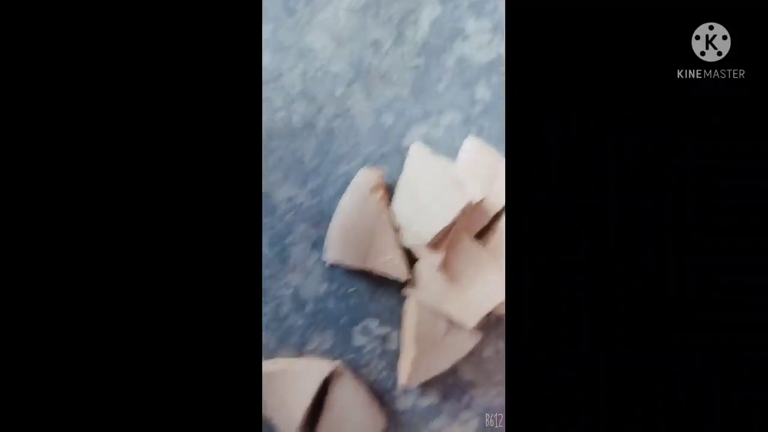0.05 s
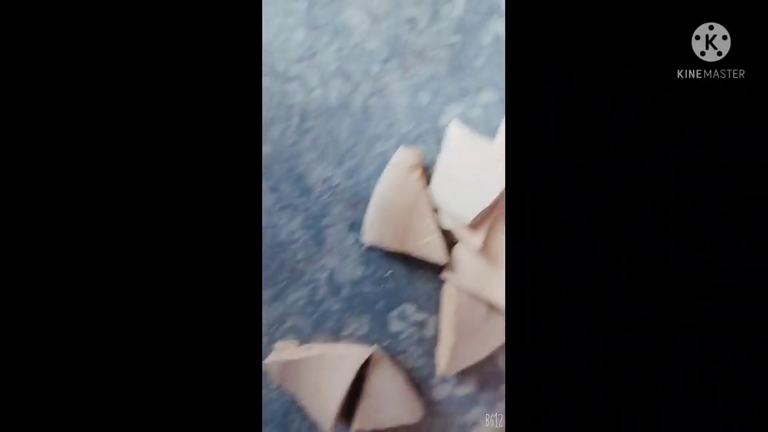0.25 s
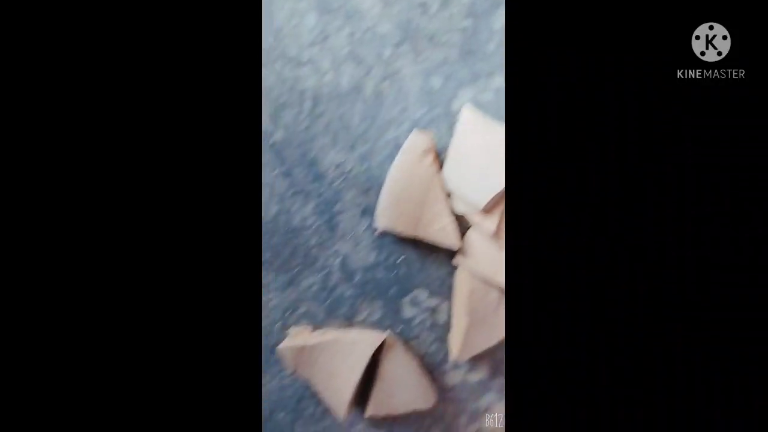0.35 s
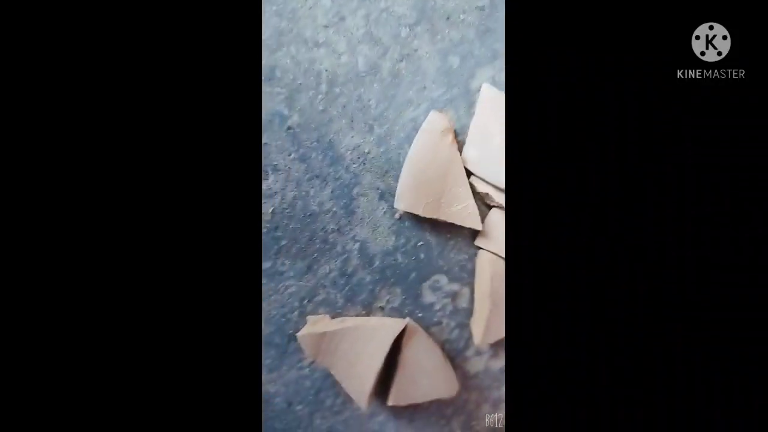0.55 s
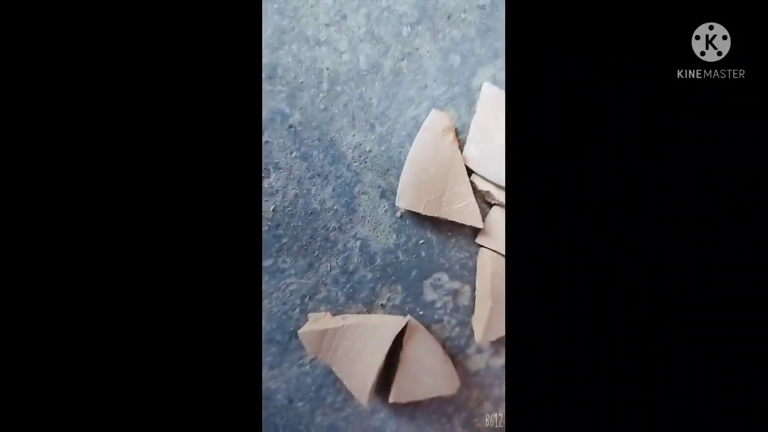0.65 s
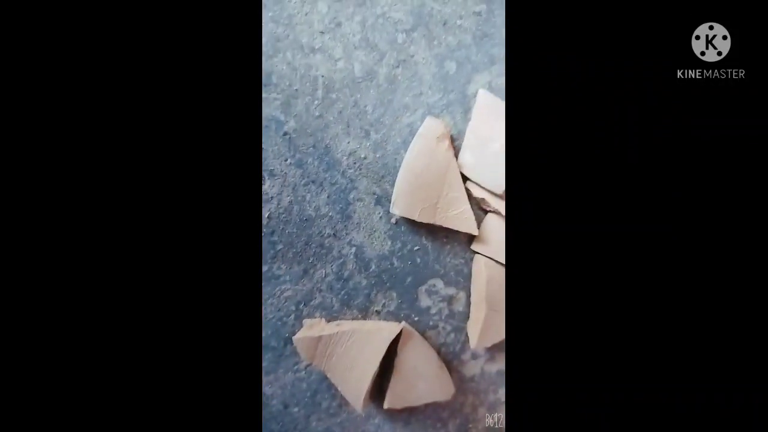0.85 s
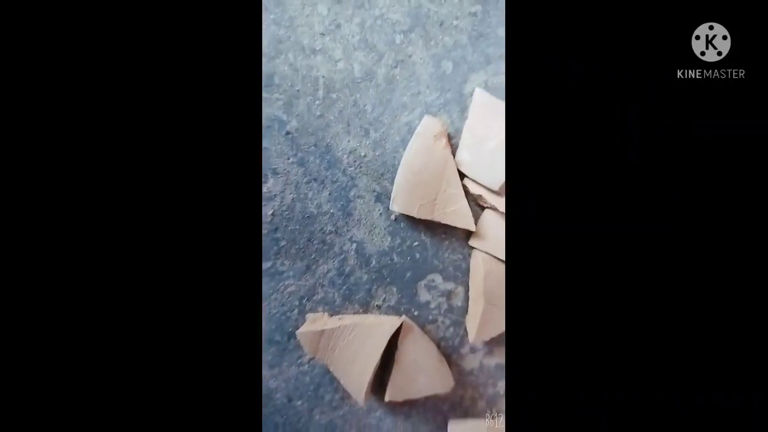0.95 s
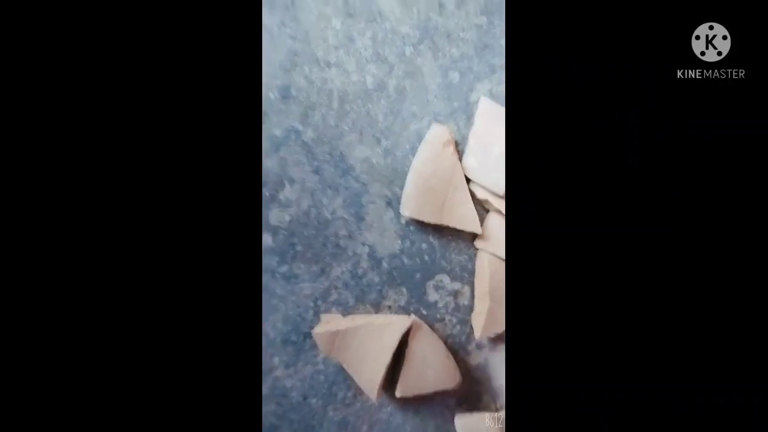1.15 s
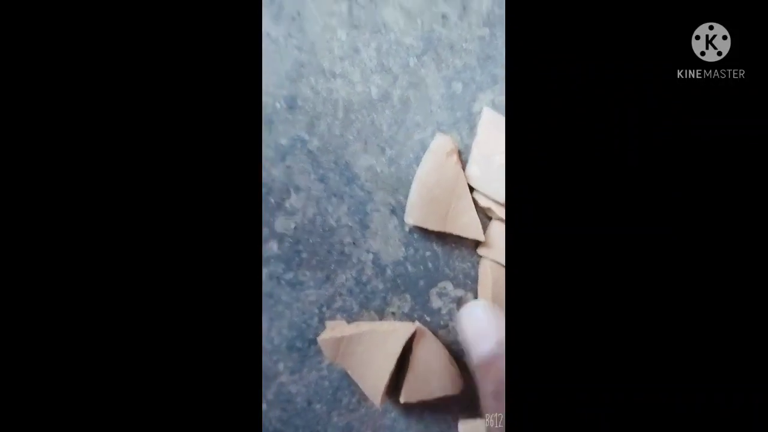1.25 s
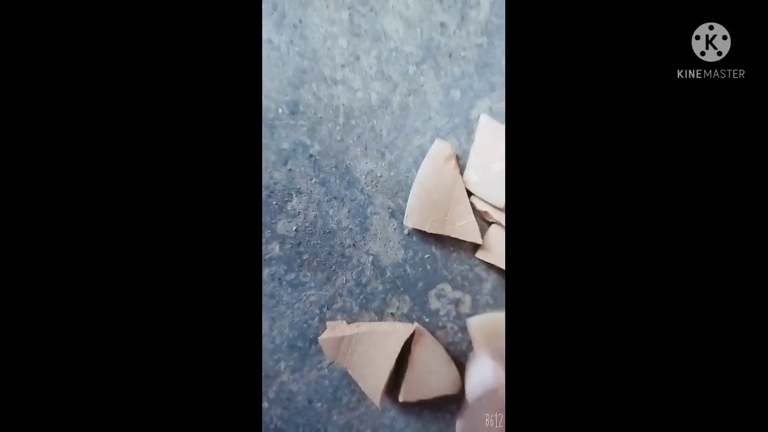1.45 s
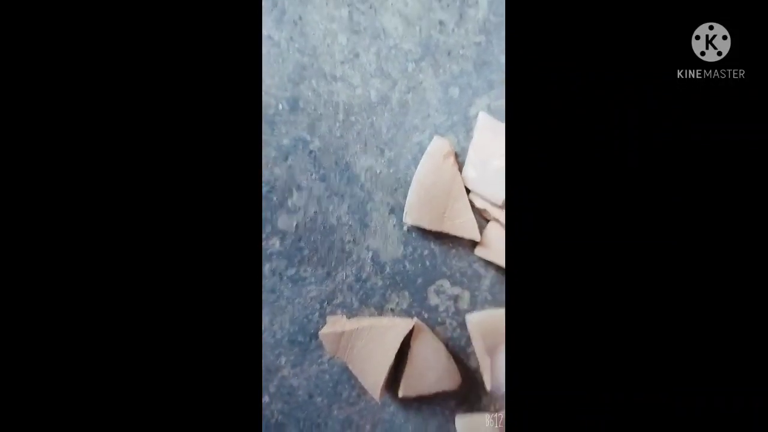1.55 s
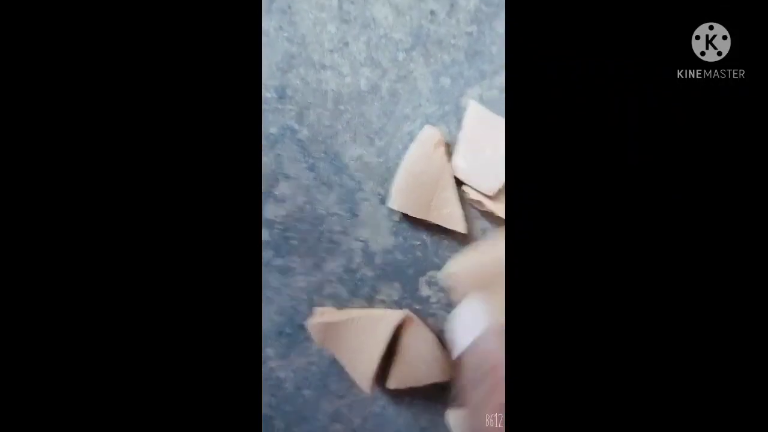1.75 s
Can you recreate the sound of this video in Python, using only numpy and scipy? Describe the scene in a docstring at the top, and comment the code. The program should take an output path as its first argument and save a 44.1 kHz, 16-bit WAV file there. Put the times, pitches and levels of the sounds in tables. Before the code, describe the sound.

Thin clay shards clink and knock on a hard slab, then rustle faintly under fingers.

```python
"""Three thin clay shards touch and ring in their bending modes, giving high, beating clinks close by.
Twice a piece is set down on a hard slab with a sharp, damped knock and settles; soft bumps wake the
slab's low modes. Then friction takes over: shards slide lightly on each other and fingers brush the
dry pile. A small room reverberates, with a low rumble throughout."""
import sys
import numpy as np
from scipy import signal
from scipy.fft import rfft, irfft
from scipy.io import wavfile

SR = 44100
rng = np.random.default_rng(int(sys.argv[2]) if len(sys.argv) > 2 else 0)


def store_wav(level_fs):
    """Save 16-bit WAV to argv[1]."""
    pcm = np.round(np.clip(np.atleast_2d(level_fs), -1, 1) * 32767)
    wavfile.write(sys.argv[1], SR, pcm.T.astype(np.int16))


N = 79380
TIME = np.arange(N) / SR


def from_db(db):
    """Amplitude ratio of a level in decibels."""
    return 10 ** (np.asarray(db) / 20)


def at_hz(points, hz):
    """Interpolation of a table along a logarithmic frequency axis."""
    f, value = np.transpose(points)
    return np.interp(np.log(np.maximum(hz, 1)), np.log(f), value)


def colour(x, spectrum):
    """Spectral shaping of white noise at constant power."""
    gain = from_db(at_hz(spectrum, np.arange(N + 1) * SR / (2 * N)))
    return irfft(rfft(x, 2 * N) * gain / np.sqrt(np.mean(gain ** 2)))[:N]


def decay(start, t60):
    """Exponential decay: a jump to 1 at the start, then a fall of 60 dB every t60 seconds."""
    return (TIME >= start) * np.exp(-np.log(1000) * np.maximum(TIME - start, 0) / t60)


def ring(start, hz, t60):
    """Free vibration of one struck mode: a damped sinusoid."""
    return decay(start, t60) * np.sin(2 * np.pi * hz * (TIME - start))


def rumble(level_db=-56):
    """Stationary noise: the room's background, strongest in the bass."""
    # background spectrum: (frequency [Hz], relative level [dB])
    spectrum = [(20, -21.5), (50, -18.5), (66, -13.5), (83, 4), (108, -5.5), (200, 3), (300, -3),
                (600, -8.5), (1000, -15.5), (2100, -19.5), (4200, -28), (7900, -36.5), (10500, -29),
                (15000, -34)]
    return from_db(level_db) * colour(rng.standard_normal(N), spectrum)


def clinks(contact_s=0.0014, tick_t60=0.0051, twin_db=-12, twin_spread_db=3.5):
    """Impact excites bending modes; each beats with a close twin whose share depends on the spot struck."""
    # mode pairs, a row per shard from large to small: (frequency [Hz], twin frequency [Hz], free t60 [s])
    top_modes = [(10308, 10340, .1), (10900, 10850, .085), (11548, 11625, .1)]
    middle_modes = [(5420, 5400, .18), (5716, 5732, .21), (6092, 6150, .19)]
    low_modes = [(1902, 1906, .34), (2015, 2035, .22), (2182, 2176, .44)]
    # each shard's low mode against its middle mode: (offset [dB])
    low_offsets_db = [-4, -4.5, -2.5]
    # touches: (time [s], top mode level of each shard [dB] x 3, middle mode level of each [dB] x 3,
    #   further low mode offset [dB], tick level [dB], share of the free t60 [ratio])
    touches = [(0.001, -41.5, -38, -42, -61.5, -57, -69, 0.5, -78, 1.57),
               (0.1906, -33.5, -27, -52, -52, -62, -67, -10, -40.5, 1.29),
               (0.2705, -29, -31, -11.5, -41, -29.5, -29.5, -10.5, -23, 1.01),
               (0.281, -39, -35, -25, -48, -41.5, -38, -18.5, -31.5, 0.27),
               (0.315, -22.5, -28, -26.5, -50, -55.5, -48.5, 0.5, -42, 1.39),
               (0.385, -22.5, -19.5, -41.5, -47, -39.5, -49.5, -8, -26, 1.02),
               (0.5475, -27.5, -21.5, -32, -62.5, -51.5, -65.5, 4, -27.5, 1.1),
               (0.587, -39, -31, -45.5, -63.5, -70.5, -70, -4, -45.5, 1.23),
               (0.639, -27, -12.5, -23.5, -50, -46, -53.5, -3.5, -22, 0.87),
               (0.819, -48.5, -26, -38.5, -54.5, -66, -67, -9.5, -38, 1.24),
               (0.859, -20, -12, -21, -46, -31.5, -44.5, -8.5, -33, 0.63),
               (0.891, -35.5, -23.5, -39.5, -49, -54, -63, -7, -51, 0.36),
               (1.5603, -46, -26.5, -45, -72, -59.5, -69, 4, -34.5, 0.69),
               (1.575, -56, -35, -54, -61, -52, -75, -5.5, -51.5, .25),
               (1.617, -70, -67, -71.5, -78.5, -83, -81, -6, -49, 0.56)]
    # contact tick spectrum: (frequency [Hz], relative level [dB])
    tick_spectrum = [(500, -11.5), (3000, -33.5), (7000, -10), (10000, -5.5), (12500, 1), (14300, -5),
                     (16000, -10.5)]
    out = np.zeros(N)
    tick_noise = colour(rng.standard_normal(N), tick_spectrum)
    modes = top_modes + middle_modes + low_modes
    twins = from_db(twin_db + twin_spread_db * rng.standard_normal((len(touches), len(modes))))
    for (start, *shard_db, low_db, tick_db, t60_share), twin_gains in zip(touches, twins):
        top_db, middle_db = np.reshape(shard_db, (2, -1))
        gains = from_db(np.concatenate([top_db, middle_db, middle_db + low_db + low_offsets_db]))
        touch = from_db(tick_db) * decay(start, tick_t60) * tick_noise
        # the ring builds up while the edges are in contact
        onset = np.sin(np.pi / 2 * np.clip((TIME - start) / contact_s, 0, 1)) ** 2
        for (hz, twin_hz, free_t60), gain, twin in zip(modes, gains, twin_gains):
            t60 = free_t60 * t60_share
            beating = ring(start, hz, t60) + twin * ring(start, twin_hz, t60)
            touch += gain * onset * beating / np.hypot(1, twin)
        out += signal.fftconvolve(touch, chatter(start))[:N]
    return out


def chatter(start, contacts_per_s=1100, level_db=-21.5, t60=0.088):
    """Loose shards rattle: a dying train of random impulses, timed from the touch that sets it off."""
    contacts = (rng.random(N) < contacts_per_s / SR) * rng.standard_normal(N)
    train = contacts * from_db(level_db) * decay(0, t60)
    train[0] = 1   # the touch itself
    return train[:N - int(start * SR)]


def reverberation(x, delay_s=0.0032):
    """Diffuse reflections: convolution with noise that decays at its own rate in each band."""
    # strength of the tail: (frequency [Hz], band gain [dB])
    band_gains = [(150, -8), (600, -5), (2000, -13.5), (5000, -12.5), (8000, -8.5), (11000, -18.5),
                  (15000, -9)]
    # reverberation time: (frequency [Hz], t60 [s])
    band_t60s = [(150, 0.2), (600, 0.42), (2000, 0.38), (5000, 0.33), (11000, 0.063), (15000, 0.49)]
    response = np.zeros(N)
    edges_hz = np.geomspace(60, 17000, 10)
    for low, high in zip(edges_hz, edges_hz[1:]):
        centre_hz = np.sqrt(low * high)
        bandpass = signal.butter(2, [low, high], "band", fs=SR, output="sos")
        band = signal.sosfilt(bandpass, rng.standard_normal(N))
        tail = decay(delay_s, at_hz(band_t60s, centre_hz))
        response += from_db(at_hz(band_gains, centre_hz)) * band * tail / np.sqrt(np.sum(tail ** 2))
    return signal.fftconvolve(x, response)[:N]


def knocks():
    """Contact damping: pieces ring briefly on the slab, with a crunch of grit, duller for gentle blows."""
    # impacts: (time [s], large piece level [dB], small piece level [dB], chip level [dB],
    #   grit level [dB], grit t60 [s], grit cutoff [Hz])
    impacts = [(0.2487, -11.5, -18, -65, -23, 0.0054, 14100), (0.2509, -25.5, -42, -63, -18, 0.03, 14000),
               (0.272, -38, -29, -60, -14, 0.025, 14600), (0.8741, -44, -11, -49, -25.5, 0.059, 11000),
               (0.938, -36, -54.5, -69.5, -44.5, .02, 5070), (0.9482, -38.5, -27, -27, -33, 0.046, 8500),
               (0.967, -58, -36, -49, -41, 0.017, 6000), (1.3081, -54, -68, -81.5, -42.5, 0.022, 2700),
               (1.643, -56, -71, -74, -56, 0.014, 3200)]
    # modes damped by the slab: (frequency [Hz], relative level [dB], t60 [s])
    large_piece = [(620, -10.5, .02), (1153, 1, .0038), (2163, 0, .013), (2980, -2, .011),
                   (3860, 2.5, .009), (4600, -11, .012), (5600, -8.5, .014), (6400, -5.5, .015),
                   (8950, -17, .012), (12200, -9, .007)]
    small_piece = [(505, -21.5, .08), (1000, -17, .015), (1820, -14, .014), (2520, -11, .012),
                   (3400, -4.5, .012), (3930, -2, .012), (4350, -1, .011), (4750, -3, .01),
                   (5180, -8, .016), (5560, -10, .016), (9075, -8, .021)]
    chip = [(5250, -16, .07), (7381, -8.5, .08), (9109, -15, .045), (14290, -14, .028)]
    # grit spectrum: (frequency [Hz], relative level [dB])
    grit_spectrum = [(80, -14), (250, -2.5), (600, -2.5), (2000, -6), (6400, 1), (7300, -14.5), (12000, 4),
                     (15500, -7)]
    out = np.zeros(N)
    grit = colour(rng.standard_normal(N), grit_spectrum)
    for start, large_db, small_db, chip_db, grit_db, grit_t60, grit_cutoff_hz in impacts:
        for modes, db in ((large_piece, large_db), (small_piece, small_db), (chip, chip_db)):
            for k, (hz, mode_db, t60) in enumerate(modes):
                out += (-1) ** k * from_db(db + mode_db) * ring(start, hz, t60)
        lowpass = signal.butter(2, grit_cutoff_hz, fs=SR, output="sos")
        out += from_db(grit_db) * signal.sosfilt(lowpass, decay(start, grit_t60) * grit)
    return out


def bumps():
    """A soft impact carries little treble, so the hand excites only the slab's low modes."""
    # soft blows: (time [s], level [dB], t60 [s])
    blows = [(0.271, -23.5, 0.056), (0.6393, -35.5, 0.019), (0.8594, -40.5, 0.041)]
    # slab modes: (frequency [Hz], relative level [dB])
    slab_modes = [(65, -11.5), (115, -3.5), (230, -9.5), (385, -4.5), (500, -8.5)]
    return sum(from_db(db + mode_db) * ring(start, hz, t60)
               for start, db, t60 in blows for hz, mode_db in slab_modes)


def friction(catches_per_s=8200, spread_db=4):
    """Roughness noise: tiny catches of a surface make dense random impulses, scaled to unit rms."""
    catches = (rng.random(N) < catches_per_s / SR) * rng.choice([-1, 1], N)
    impulses = catches * from_db(spread_db * np.minimum(rng.exponential(1, N), 4))
    return impulses / np.std(impulses)


def slides():
    """Sliding friction: short slips of clay on clay excite chiefly two high resonances."""
    # slips: (time [s], level [dB], t60 [s])
    slips = [(1.195, -50, 0.026), (1.219, -43.5, 0.039), (1.233, -59.5, 0.44), (1.263, -63, 0.097),
             (1.311, -42.5, 0.057)]
    # sliding spectrum: (frequency [Hz], relative level [dB])
    spectrum = [(1500, -18), (2100, -1), (2800, -30.5), (5000, -23), (5700, -10.5), (6800, -20),
                (9500, -31), (10250, 15), (11200, -8.5), (12200, -7), (12850, 10), (13800, -22),
                (16000, -13)]
    envelope = sum(from_db(db) * decay(start, t60) for start, db, t60 in slips)
    return colour(friction(), spectrum) * envelope


def brushes():
    """Light friction: dry fingers sweep over the shards in soft Gaussian swells."""
    # strokes: (peak time [s], level [dB], standard deviation [s])
    strokes = [(1.672, -45.5, 0.0084), (1.704, -45, 0.0074), (1.746, -44.5, 0.015)]
    # brushing spectrum: (frequency [Hz], relative level [dB])
    spectrum = [(300, 7), (1500, -7.5), (4000, -7), (7000, -12), (9500, 0.5), (13500, -6), (15100, 8.5),
                (16000, -3)]
    envelope = sum(from_db(db) * np.exp(-.5 * ((TIME - peak) / width) ** 2) for peak, db, width in strokes)
    return colour(friction(), spectrum) * envelope


def scene():
    """Superposition of the direct sound, its reverberation and the rumble in one channel."""
    direct = clinks() + knocks() + bumps() + slides() + brushes()
    background = rumble()
    return (direct + reverberation(direct) + background)[None]


def record(dry):
    """Band limiting: a gentle high-pass thins the deep bass and a steep low-pass cuts the top."""
    low_cut_hz, high_cut_hz = 64, 15700
    highpass = signal.butter(2, low_cut_hz, "high", fs=SR, output="sos")
    lowpass = signal.ellip(10, .1, 80, high_cut_hz, fs=SR, output="sos")
    return signal.sosfilt(lowpass, signal.sosfilt(highpass, dry))


dry = scene()
out = record(dry)
store_wav(out)
```